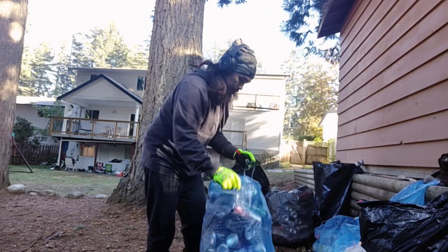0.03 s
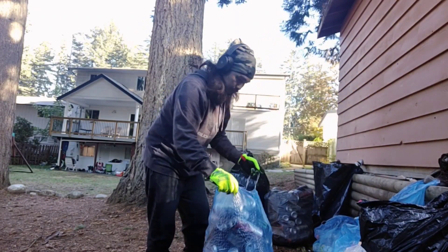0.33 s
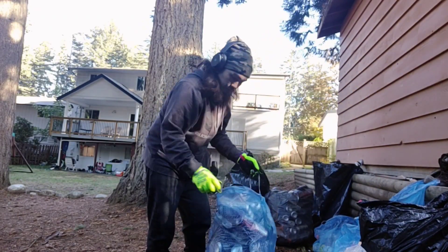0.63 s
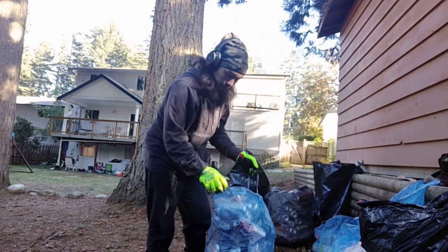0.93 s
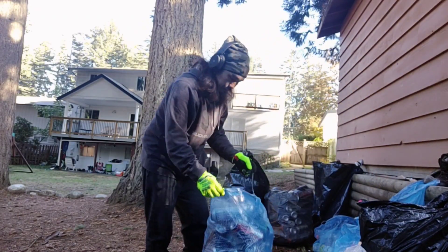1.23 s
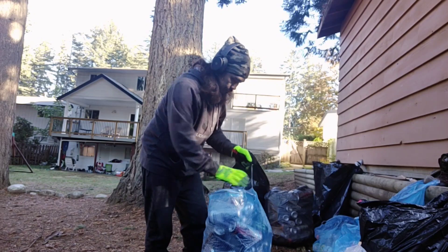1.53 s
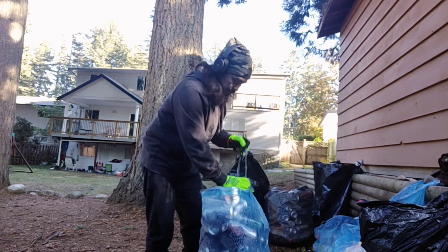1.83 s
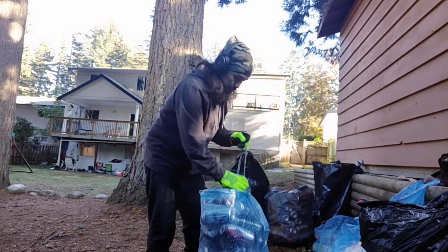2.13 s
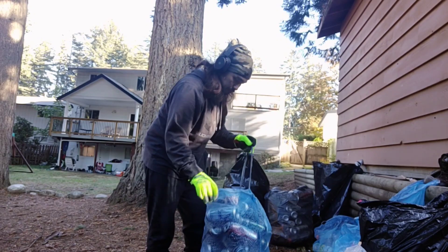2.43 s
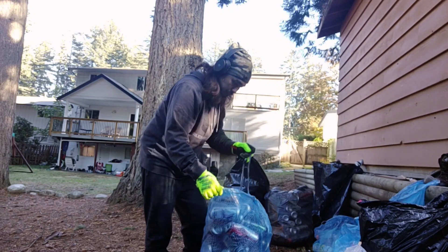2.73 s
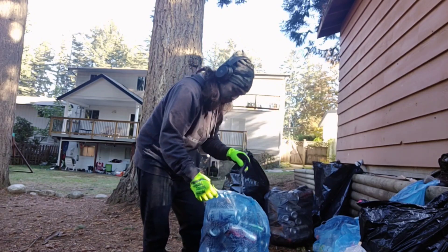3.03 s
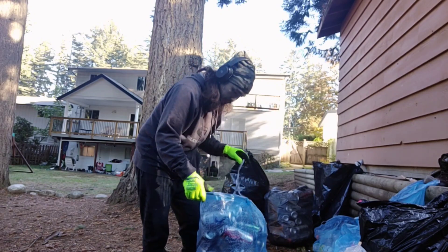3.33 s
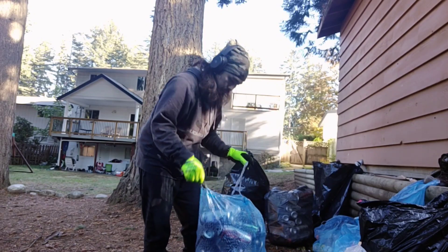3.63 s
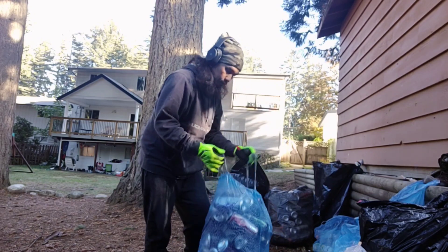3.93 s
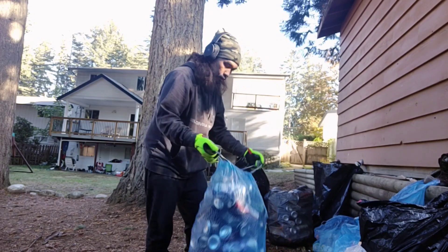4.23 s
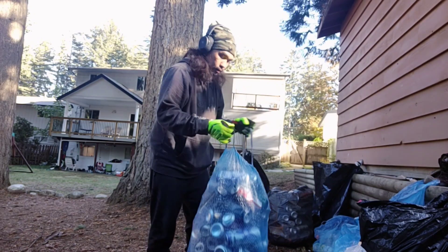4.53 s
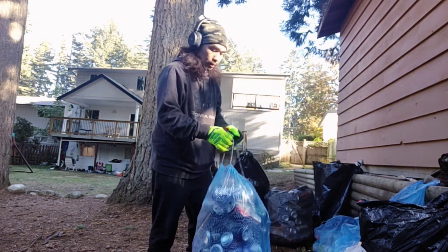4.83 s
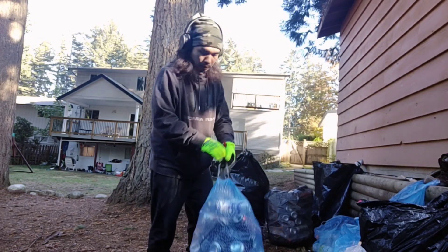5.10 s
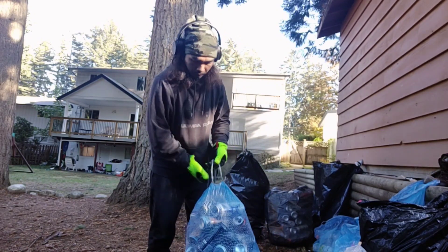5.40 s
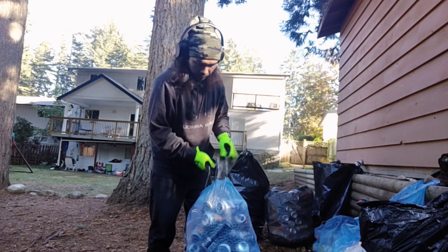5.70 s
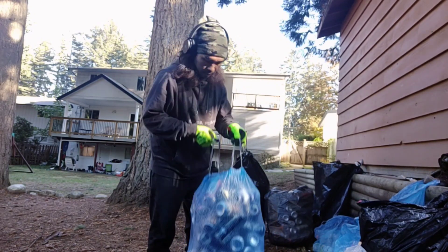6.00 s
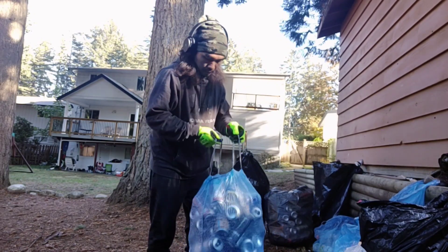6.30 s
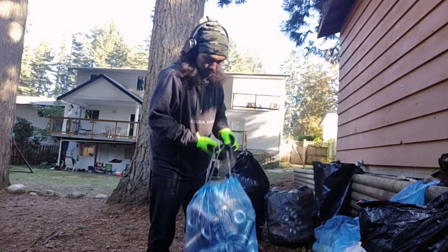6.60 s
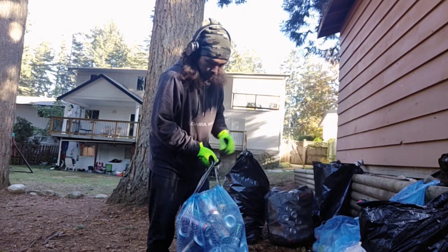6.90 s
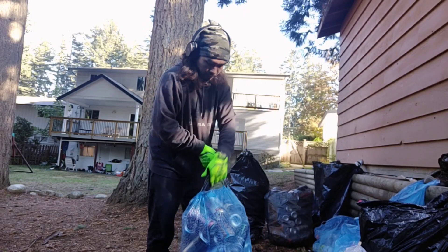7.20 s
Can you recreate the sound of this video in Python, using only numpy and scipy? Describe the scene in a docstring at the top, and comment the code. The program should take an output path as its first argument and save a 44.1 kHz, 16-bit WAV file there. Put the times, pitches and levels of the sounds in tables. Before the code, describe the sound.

Empty drink cans knock and jostle inside a rustling plastic bag as it is gripped, lifted and jerked shut in a yard.

```python
"""A thin plastic bag full of empty drink cans is gripped, lifted and jerked shut in a back yard.
It opens with a loud knock of can on can, a snap of plastic and a dull bump of the whole load.
Then the plastic crinkles as its creases buckle, the cans jostle, and the bag squeaks once near 1.7 s.
The knocks and snaps get loud again near 4.5, 5 and 6.1 s, and a last knock comes at 7.3 s.
All along, a tree trunk and a shed wall throw back short echoes over a faint outdoor rumble."""
import sys
import numpy as np
from scipy import signal
from scipy.fft import rfft, irfft, next_fast_len
from scipy.io import wavfile
from scipy.ndimage import uniform_filter1d

SR = 44100
rng = np.random.default_rng(int(sys.argv[2]) if len(sys.argv) > 2 else 0)


def to_wav(s):
    """Save 16-bit WAV."""
    ch = np.atleast_2d(s).T  # columns
    pcm = np.round(np.clip(ch, -1, 1) * 32767)  # PCM
    wavfile.write(sys.argv[1], SR, pcm.astype(np.int16))


N = 324135
TIME = np.arange(N) / SR
HIT_TIME = TIME[:SR // 4]   # the clock for one short hit

# Tone shapes, each with columns (frequency [Hz], level [dB])
YARD_TONE = [(15, -8), (28, -7), (42, 0), (80, -2), (160, -9), (250, -8), (400, -17), (630, -20),
             (1100, -17), (2000, -25), (4000, -33), (15000, -39)]   # outdoor rumble
LOAD_TONE = [(30, -26), (80, -6.5), (150, -6.5), (290, 4), (400, -14), (560, -14), (1200, -26.5),
             (5000, -24.5)]   # the whole load moving
CAN_WALL_TONE = [(150, -46), (450, -10.5), (650, -15), (850, -7), (1300, -2), (1750, -10.5), (2200, -7),
                 (2800, -15), (5000, -16), (12000, -55.5)]   # a can's thin wall
CAN_RIM_TONE = [(1200, -14), (2400, 0), (3500, 1), (5500, -7), (9000, -8), (15000, -21.5)]   # its stiff rim and lid
PLASTIC_TONE = [(300, -39.5), (900, -12), (2000, -6.5), (3500, 2.5), (5500, -2.5), (8500, 2.5),
                (11000, -0.5), (15500, -6)]   # the bag's thin plastic
SIDE_TONE = [(100, -51.5), (300, -24.5), (700, -1.5), (1300, -8), (2500, -5.5), (5000, -2), (9000, 0.5),
             (15000, 2)]   # the part that differs between left and right
LEFT_MIC_TONE = [(400, 0), (700, 0.5), (1300, 1.5), (4000, -1), (6000, 3), (7300, 5.5), (8600, 8),
                 (10000, -0.5), (11500, -3.5), (15000, -5)]   # the left microphone's opening rings near 8 kHz
RIGHT_MIC_TONE = [(400, 0.5), (700, -2.5), (1300, 2), (4000, -0.5), (6000, -2.5), (7700, -9), (8600, -12),
                  (10000, -8), (11500, -7), (15000, -5.5)]   # the right one has a dip there
# Hands grip, press and pull the bag:
# (start [s], length [s], crinkle level [dB], jostle level [dB], load level [dB])
HAND_MOVES = [(-0.02, 0.033, -31, -26, -41), (0.07, 0.068, -58, -37.5, -39),
              (0.249, .14, -51.5, -44.5, -49.5), (0.832, 0.45, -57, -58, -56.5),
              (1.225, 0.17, -50.5, -43.5, -52), (1.425, 0.21, -56.5, -49.5, -51),
              (1.536, 0.35, -50.5, -45.5, -49), (1.62, 0.071, -39.5, -40.5, -51),
              (1.92, 0.18, -53, -50.5, -51.5), (2.318, 0.28, -53.5, -50.5, -51.5),
              (2.597, .29, -58.5, -64.5, -62), (2.959, 0.047, -58.5, -54, -55),
              (3.246, 0.18, -50.5, -54.5, -58), (3.46, 0.29, -43.5, -45.5, -45.5),
              (3.787, 0.2, -49.5, -52.5, -56.5), (3.95, 0.62, -51.5, -49, -53),
              (4.229, 0.044, -47, -41, -48), (4.517, 0.055, -36, -32.5, -34), (4.766, 0.39, -53, -63, -58),
              (4.907, .1, -47, -38.5, -46), (5.24, 1.1, -58, -60.5, -59), (5.501, 0.16, -48.5, -50, -48.5),
              (5.713, 0.043, -50, -44.5, -44), (5.926, 0.2, -53.5, -47, -53),
              (6.063, 0.14, -44.5, -39, -40), (6.248, 0.019, -45, -47, -48),
              (6.503, 0.083, -52.5, -45.5, -42), (6.7, 0.062, -52.5, -53.5, -54),
              (7.01, 0.23, -57, -61, -56), (7.263, 0.065, -47.5, -53.5, -48.5)]
# The load bumps when jerked or set down: (time [s], level [dB], pitch [Hz], length [s])
LOAD_BUMPS = [(0.0, -21.5, 387, 0.026), (1.702, -33, 266, 0.028), (1.838, -32.5, 157, .0084),
              (4.266, -30.5, 208, 0.032), (4.55, -22, 547, 0.013), (4.578, -32, 258, 0.012),
              (4.975, -23.5, 337, 0.014), (5.293, -33.5, 382, 0.018), (5.731, -33, 243, .029),
              (6.118, -21, 255, 0.024), (6.188, -32, 242, .018), (6.256, -33, 278, 0.015),
              (6.544, -37.5, 269, .038)]
# The packed cans ring after a knock: (pitch [Hz], level [dB], ring time [s])
# A ring time, or t60, is how long a sound takes to fade by 60 dB.
PACKED_RINGS = [(526.7, -1.5, 0.14), (776, 3, 0.13), (1420, -7.5, 0.23), (1914, -6, 0.11),
                (3260, 3.5, 0.09)]
# A can left free rings on: (time [s], level [dB], pitch [Hz], ring time [s])
FREE_RINGS = [(0.045, -31.5, 559, 0.19), (0.165, -32.5, 685, 0.089), (1.11, -42, 569, .2),
              (1.28, -41.5, 793, .2), (2.534, -27.5, 1266, 0.21), (2.535, -26.5, 1860, 0.034),
              (4.12, -31, 2213, 0.073), (4.545, -30, 822, 0.3), (4.56, -46.5, 530, 0.97),
              (5.444, -23, 2040, 0.019), (6.14, -24, 3240, .08), (6.666, -37, 3800, .06),
              (7.269, -26, 2320, 0.036)]
# Points along one squeak of plastic over a can: (time [s], pitch [Hz], level [dB])
SQUEAK_PATH = [(1.638, 1370, -49), (1.647, 1465, -36.5), (1.655, 1750, -41), (1.672, 1880, -47)]
# Creases snap out above the crinkle: (time [s], level [dB])
CREASE_SNAPS = [(0.0004, -12.5), (0.361, -30.5), (0.482, -32.5), (1.1156, -30.5), (1.339, -29),
                (1.575, -27.5), (1.694, -26.5), (2.399, -32), (2.692, -34.5), (3.48, -24), (3.62, -26.5),
                (3.808, -27), (4.271, -24.5), (4.371, -30.5), (4.5373, -24), (4.9613, -13.5),
                (5.311, -31.5), (5.349, -31), (5.4083, -30), (5.475, -28), (5.671, -28.5), (5.7248, -26),
                (6.0303, -26), (6.104, -17), (6.122, -13), (6.138, -13), (6.249, -22), (6.261, -14),
                (6.3636, -31), (6.3746, -32.5), (6.4218, -30), (6.482, -35.5), (6.514, -29.5), (6.725, -31),
                (7.111, -31), (7.304, -33)]
# Clear knocks of can on can:
# (time [s], level [dB], main pitch [Hz], rim boost [dB], left minus right [dB], contact length [s])
CAN_KNOCKS = [(0.0, -11, 2000, -3.5, -1.5, 0.0053), (0.015, -20.5, 1198, -3.5, -6, 0.029),
              (0.086, -21, 1504, -0.5, -9, 0.0072), (0.162, -24.5, 1180, -8.5, -2, 0.0075),
              (0.279, -32, 1350, -3.5, 2, 0.0038), (0.349, -32, 1110, -19, 0, .021),
              (1.098, -34.5, 1330, -9, 1, 0.031), (1.338, -28, 1300, -6, 2, .012),
              (1.351, -27.5, 1447, -22, 0, 0.022), (1.386, -28.5, 1300, -5, 5.5, 0.0085),
              (1.706, -18.5, 2137, -4, 0, 0.015), (1.857, -30, 1260, -9, -1, 0.0069),
              (1.982, -28, 1450, -5.5, -1.5, 0.0082), (2.403, -35, 1196, 0.5, -1, 0.015),
              (2.532, -23.5, 1277, -5.5, -4, 0.0079), (3.33, -37, 1200, -3.5, 0, 0.021),
              (3.581, -32.5, 776, -25, 8, 0.0092), (4.026, -31.5, 1049, -5.5, 2, 0.03),
              (4.12, -33, 2310, -4.5, -4.5, 0.016), (4.19, -31.5, 1480, -19, -3, 0.0066),
              (4.439, -29, 1440, -27, -4, 0.0033), (4.543, -12, 1460, -25, -.5, 0.0075),
              (4.556, -16, 1393, -23, 0, 0.015), (4.947, -25.5, 960, 0.5, 0, .014),
              (4.969, -20, 1315, 9.5, -3, 0.0071), (5.444, -22, 1100, -4.5, -1.5, 0.011),
              (5.56, -33.5, 1230, -14, -2, 0.0031), (5.622, -32.5, 1334, -17, -1, 0.023),
              (6.096, -17.5, 1273, -6, 3, 0.021), (6.11, -9, 1350, -7, -1, 0.013),
              (6.124, -12, 1367, -23, -1, 0.0078), (6.139, -21.5, 1260, 6, -2, 0.0082),
              (6.2, -26.5, 1435, -3.5, -3, 0.01), (6.246, -29, 1520, 0.5, 4, 0.015),
              (6.258, -17.5, 2190, -0.5, 1, 0.0086), (6.55, -30, 1212, -21, 1, .019),
              (6.665, -26.5, 1150, -1.5, 3.5, 0.0043), (7.107, -37.5, 920, -20, 4, 0.0029),
              (7.269, -22, 1530, -16, 0, .006)]


def from_db(db):
    """Turn decibels into a number to multiply by."""
    return 10 ** (np.asarray(db) / 20)


def unit_power(x):
    """Scale a sound so that its average power is 1."""
    return x / np.sqrt(np.mean(x ** 2) + 1e-20)


def unit_peak(x):
    """Scale a sound so that its loudest three milliseconds have power 1."""
    return x / np.sqrt(uniform_filter1d(np.mean(x ** 2, axis=0), size=132).max() + 1e-20)


def add(out, start, x):
    """Mix in a short sound at a start time in seconds."""
    i = max(0, round(start * SR))
    out[:, i:i + x.shape[1]] += x[:, :N - i]


def colour(x, tone):
    """Give a sound a tone shape, without smearing it to before it starts (a minimum-phase filter)."""
    size = 2 * next_fast_len(x.shape[-1] // 2 + 2048)
    hz, db = np.transpose(tone)
    grid_hz = np.arange(size // 2 + 1) * SR / size
    log_gain = np.log(from_db(np.interp(np.log(grid_hz + 1), np.log(hz), db)))
    cepstrum = irfft(log_gain)[:size // 2]
    response = np.exp(2 * rfft(cepstrum, size) - cepstrum[0])
    return irfft(rfft(x, size) * response)[..., :x.shape[-1]]


def resonate(x, hz, width_hz):
    """Make a sound ring at one pitch; a smaller width rings longer."""
    r = np.exp(-np.pi * width_hz / SR)
    feedback = [1, -2 * r * np.cos(2 * np.pi * hz / SR), r * r]
    return signal.lfilter(np.array([1, 0, -1]) * (1 - r * r) / 2, feedback, x + 1e-18)


def noise(length=N):
    """Two unrelated rows of hiss."""
    return rng.standard_normal((2, length))


def drift(per_s):
    """A smooth random wobble, about 1 in size."""
    points = rng.standard_normal(N // 40)
    return unit_power(np.interp(TIME * per_s, np.arange(len(points)), points))


def clicks(per_s, spread_db):
    """Clicks at random times, mostly weak and a few strong."""
    return (rng.random(N) < per_s / SR) * from_db(spread_db * np.minimum(rng.exponential(1, N), 3.5))


def burst(length, rise):
    """A cluster of tiny contacts: a puff of hiss that swells and dies away."""
    swell = 1 - np.exp(-HIT_TIME / rise)
    return noise(len(HIT_TIME)) * swell * np.exp(-HIT_TIME / max(length, rise / 2))


def two_ears(x):
    """Make left and right: row 0 reaches both alike, row 1 is the scattered part that differs."""
    side = colour(x[1], SIDE_TONE)
    return np.array([x[0] + side, x[0] - side])


def hand_effort(starts, lengths, levels_db, fade_db_per_s, rest_db):
    """Level in dB over time: each move swells, holds and fades, and the bag is never quite still."""
    power = from_db(rest_db) ** 2
    for start, length, db in zip(starts, lengths, levels_db):
        swell = np.clip((TIME - start) / (0.015 + 0.1 * length), 0, 1)   # long moves swell more slowly
        fall_db = np.clip(fade_db_per_s * (TIME - start - length), 0, 100)
        power = power + (swell * from_db(db - fall_db)) ** 2
    return 10 * np.log10(power)


def yard_rumble(gain_db=-55.5):
    """The outdoor air: a faint, steady, low noise."""
    return from_db(gain_db) * two_ears(unit_power(colour(noise(), YARD_TONE)))


def yard_echo(x, near_db=-13, near_t60=0.014, far_db=-23, far_t60=0.22):
    """Sound bounces off the trunk, ground and shed wall, then comes back faint and dull from houses."""
    t = TIME[:SR]
    near = noise(SR) * from_db(-60 * t / near_t60) * (t > 0.004)
    dull_hiss = colour(noise(SR), [(1500, 8.5), (4000, 9), (12000, -12)])
    far = dull_hiss * from_db(-60 * t / far_t60) * (t > 0.015)
    echoes = (from_db(near_db) * unit_power(near) + from_db(far_db) * unit_power(far)) / np.sqrt(SR)
    return signal.fftconvolve(x, echoes, axes=1)[:, :N]


def shifting_load(load_db, width_hz=95, thud_gain=0.65, bump_db=-4, shift_db=-3):
    """The air and cans in the bag rumble softly on slow moves and bump dully on jerks."""
    shifting = noise() * from_db(4.9 * drift(per_s=35))
    out = from_db(load_db + shift_db) * unit_power(colour(shifting, LOAD_TONE))
    for start, db, hz, length in LOAD_BUMPS:
        push = burst(length, rise=0.0015)
        boom = unit_peak(resonate(push, hz, width_hz))
        thud = unit_peak(colour(push, LOAD_TONE))
        add(out, start, from_db(db + bump_db) * unit_peak(boom + thud_gain * thud))
    return out


def plastic_squeak(overtone_db=-5, jitter=0.017):
    """Plastic sticks and slips on a can, faster as it tightens, so the pitch rises."""
    times, hz, db = np.transpose(SQUEAK_PATH)
    pitch_hz = np.interp(TIME, times, hz) * (1 + jitter * drift(per_s=400))
    phase = 2 * np.pi * np.cumsum(pitch_hz) / SR
    tone = sum(from_db(overtone_db * k) * np.sin((k + 1) * phase) for k in range(3))
    return np.interp(TIME, times, from_db(db), left=0, right=0) * tone


def plastic_crinkle(plastic_db, crease_s=0.0057, slide_gain=0.37):
    """Creases buckle in tiny crackles over the hiss of plastic sliding on metal."""
    buckles = clicks(per_s=420, spread_db=5.5)
    # each click gets a short fading tail
    power = signal.lfilter([1], [1, -np.exp(-2 / (crease_s * SR))], buckles ** 2 + 1e-18)
    loudness = np.sqrt(power / power.mean() + slide_gain ** 2)
    return from_db(plastic_db) * unit_power(colour(noise() * loudness, PLASTIC_TONE))


def plastic_snaps(gain_db=-8, tick_db=-2, typical_db=-30, typical_s=0.0026):
    """Tight plastic gives way with a sharp tick and a short crackle."""
    out = np.zeros((2, N))
    for start, db in CREASE_SNAPS:
        tick = unit_peak(burst(0.001, rise=0.0001))
        length = typical_s * 2 ** ((db - typical_db) / 50)   # louder snaps last longer
        crackle = unit_peak(burst(length, rise=0.42 * length)) + from_db(tick_db) * tick
        # small, quiet creases give off only high sounds
        lowest_hz = np.clip(3800 * from_db(0.63 * (typical_db - db)), 200, 6000)
        crackle = signal.sosfilt(signal.butter(2, lowest_hz, "high", fs=SR, output="sos"), crackle)
        add(out, start, from_db(db + gain_db) * unit_peak(colour(crackle, PLASTIC_TONE)))
    return out


def can_jostle(cans_db, width_hz=100, gain_db=-2):
    """Many cans touch lightly, each at its own pitch, and scrape along each other."""
    pitches_hz = np.geomspace(520, 3600, num=26)
    taps = sum(resonate(clicks(per_s=28, spread_db=3.5) * noise(), hz, width_hz) for hz in pitches_hz)
    taps = unit_power(colour(taps, CAN_WALL_TONE))
    rubbing = noise() * from_db(4 * drift(per_s=86))
    scrape = unit_power(colour(rubbing, CAN_WALL_TONE))
    return from_db(cans_db + gain_db) * unit_power(taps + scrape)


def packed_rings(cans):
    """The packed cans ring together at a few pitches whenever they are shaken."""
    return sum(from_db(db) * resonate(cans, hz, np.log(1000) / np.pi / t60)
               for hz, db, t60 in PACKED_RINGS)


def free_rings():
    """A can that nothing presses on gives one clean, fading tone."""
    out, t = np.zeros((2, N)), TIME[:SR]
    for start, db, hz, t60 in FREE_RINGS:
        tone = from_db(db - 60 * t / t60) * np.sin(2 * np.pi * hz * t)
        add(out, start, tone[None])
    return out


def can_knocks(ring_s=0.027, overtone_gain=0.92, clack_gain=0.83, gain_db=-6):
    """A struck can rings at one main pitch and a few others, and its neighbours soon hush it."""
    out = np.zeros((2, N))
    for start, db, hz, rim_db, pan_db, length in CAN_KNOCKS:
        rise = 0.17 * length
        contact = burst(length, rise)
        # the main tone swells during the contact and is weaker in the scattered row
        loudness = (1 - np.exp(-HIT_TIME / rise)) * from_db(-60 * HIT_TIME / (ring_s + length))
        tone = np.sin(2 * np.pi * (hz * HIT_TIME + rng.random((2, 1))))
        main = unit_peak(loudness * tone * [[1], [0.5]])
        overtones = sum(resonate(contact, f, width_hz=90) for f in rng.uniform(860, 2632, size=8))
        overtones = unit_peak(colour(overtones, CAN_WALL_TONE))
        clack = unit_peak(colour(contact, CAN_WALL_TONE))
        wall = unit_peak(main + overtone_gain * overtones + clack_gain * clack)
        # the stiff rim and lid add a high clink
        clink = sum(resonate(contact, f, width_hz=170) for f in rng.uniform(2200, 5464, size=8))
        rim_hiss = colour(burst(length, rise), CAN_RIM_TONE)
        rim = unit_peak(unit_peak(clink) + unit_peak(rim_hiss))
        can = two_ears(wall + from_db(rim_db) * rim)
        left_right_db = np.array([[1], [-1]]) * pan_db / 2
        add(out, start - 0.001, from_db(db + gain_db + left_right_db) * can)
    return out


def scene():
    """Mix the cans and the plastic with their echoes and the outdoor rumble."""
    starts, lengths, crinkle_db, jostle_db, shift_db = np.transpose(HAND_MOVES)
    # after a move the plastic relaxes quickly and the cans settle more slowly
    plastic_db = hand_effort(starts, lengths, crinkle_db, fade_db_per_s=180, rest_db=-70)
    cans_db = hand_effort(starts, lengths, jostle_db, fade_db_per_s=151, rest_db=-68)
    load_db = hand_effort(starts, lengths, shift_db, fade_db_per_s=151, rest_db=-67)
    cans = can_knocks() + two_ears(can_jostle(cans_db) + shifting_load(load_db))
    plastic = plastic_squeak() + two_ears(plastic_crinkle(plastic_db) + plastic_snaps())
    bag = cans + packed_rings(cans) + free_rings() + plastic
    return yard_rumble() + yard_echo(bag) + bag


def record(dry, right_lag_s=6.5e-5, cutoff_hz=15900):
    """Each microphone colours its side, the right hears a little later, and the very top is cut."""
    left = colour(dry[0], LEFT_MIC_TONE)
    right = colour(dry[1], RIGHT_MIC_TONE)
    size = next_fast_len(N + 64)
    delay = np.exp(-2j * np.pi * np.fft.rfftfreq(size, 1 / SR) * right_lag_s)
    right = irfft(rfft(right, size) * delay, size)[:N]
    return signal.sosfilt(signal.ellip(10, 0.3, 80, cutoff_hz, fs=SR, output="sos"), [left, right])


dry = scene()
out = record(dry)
to_wav(out)
```